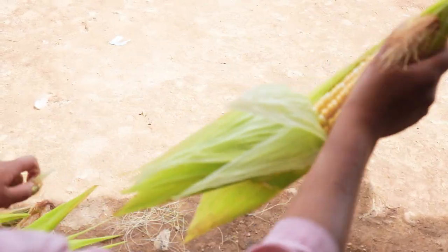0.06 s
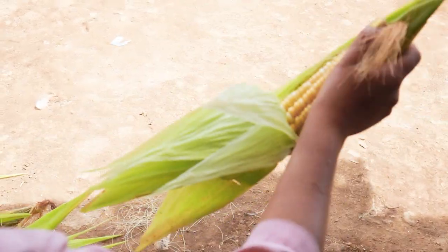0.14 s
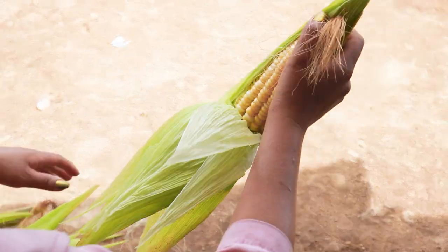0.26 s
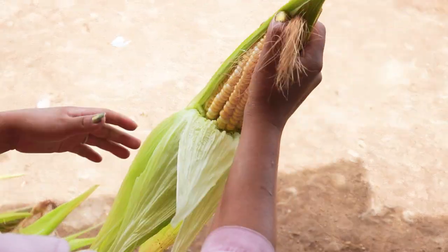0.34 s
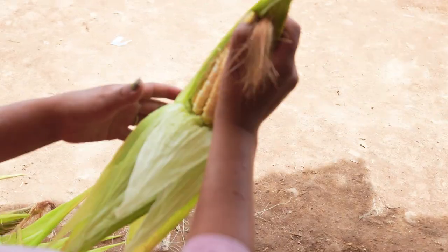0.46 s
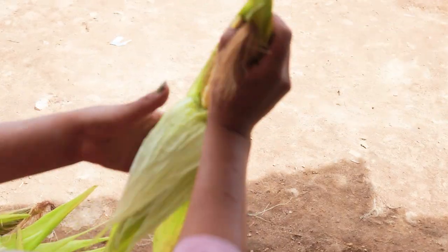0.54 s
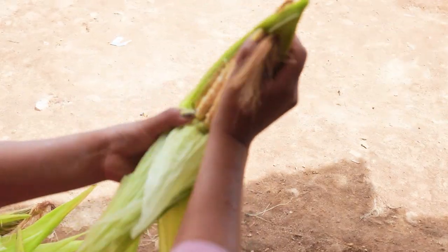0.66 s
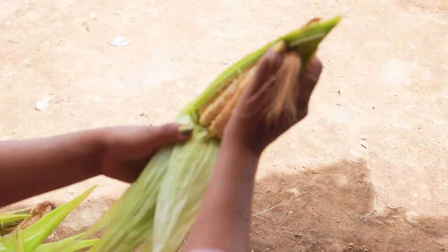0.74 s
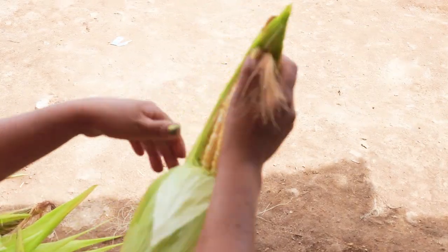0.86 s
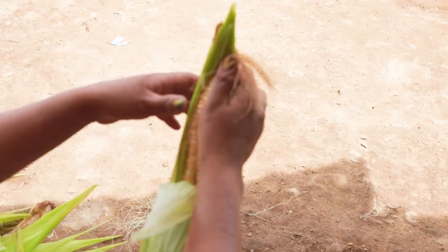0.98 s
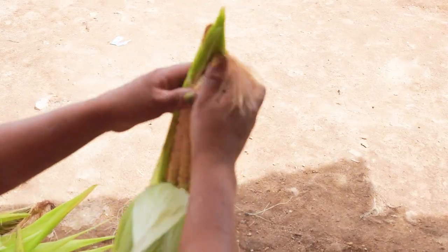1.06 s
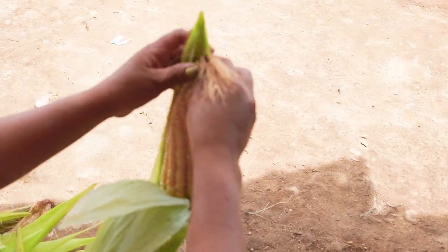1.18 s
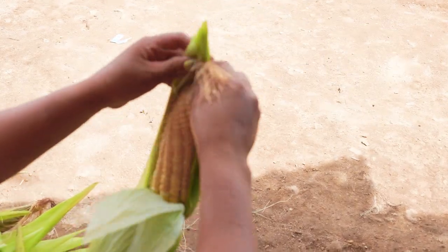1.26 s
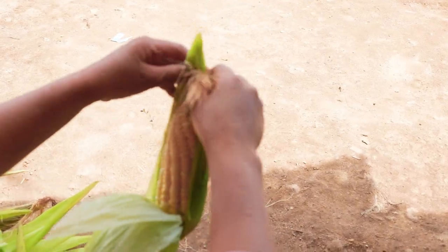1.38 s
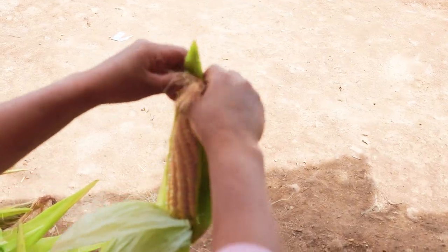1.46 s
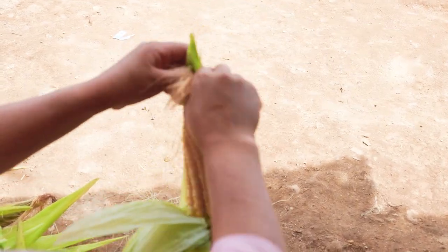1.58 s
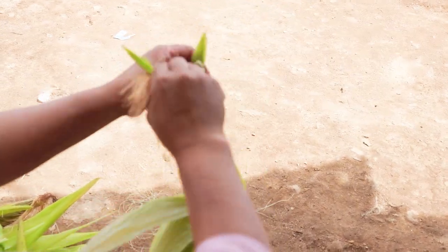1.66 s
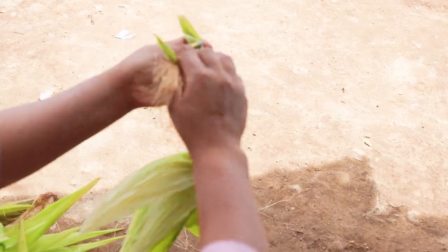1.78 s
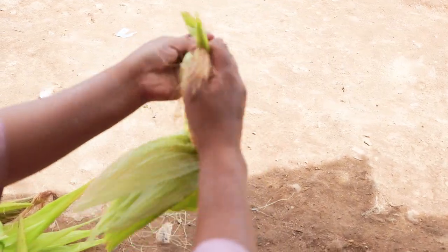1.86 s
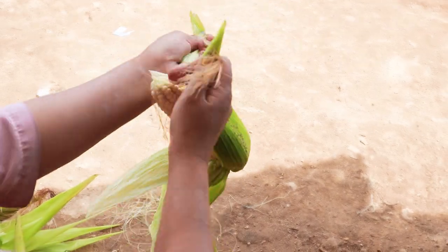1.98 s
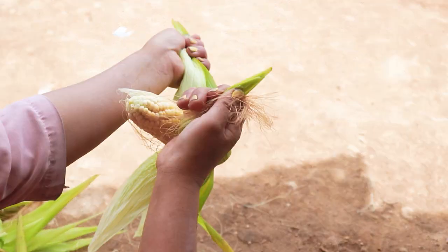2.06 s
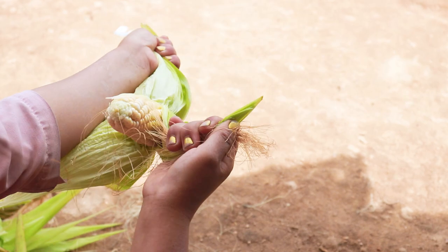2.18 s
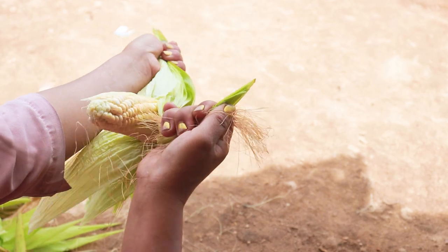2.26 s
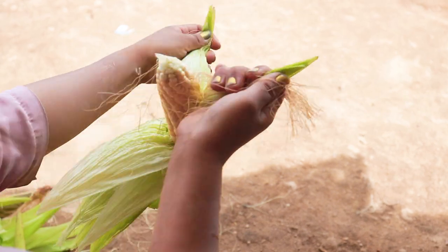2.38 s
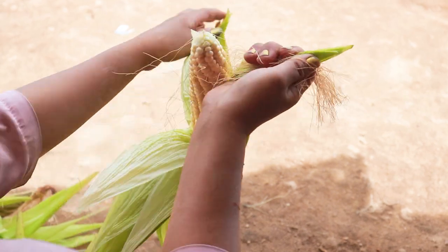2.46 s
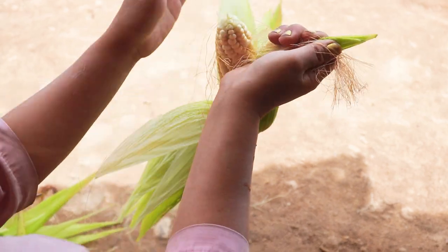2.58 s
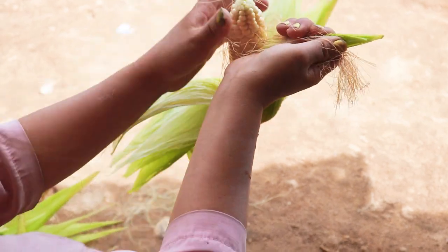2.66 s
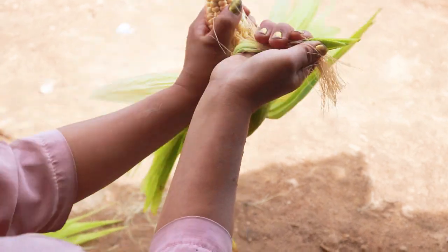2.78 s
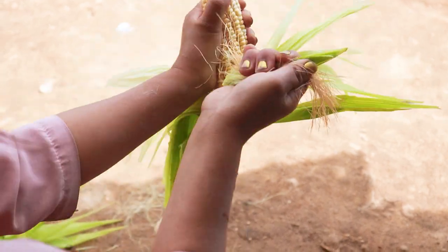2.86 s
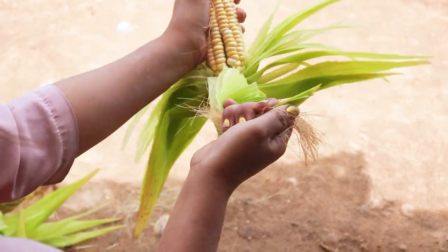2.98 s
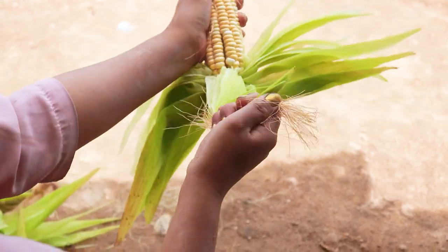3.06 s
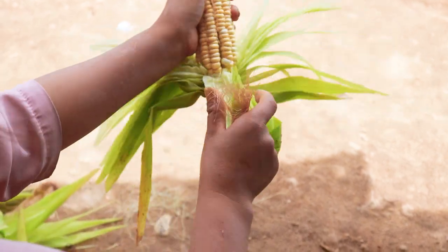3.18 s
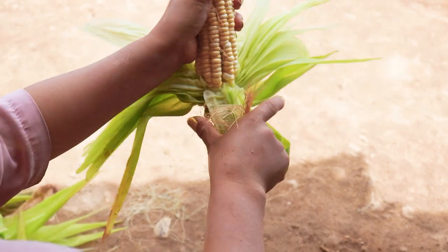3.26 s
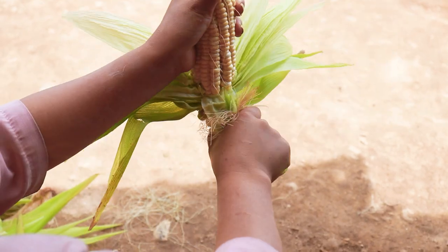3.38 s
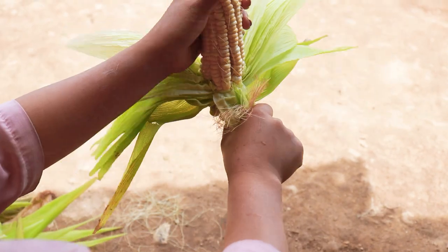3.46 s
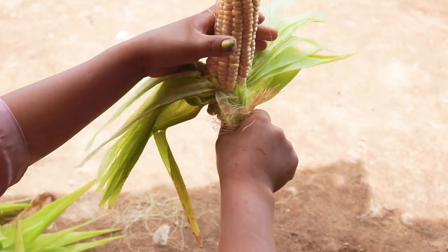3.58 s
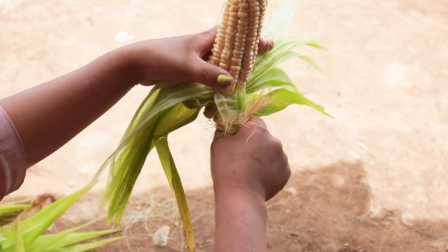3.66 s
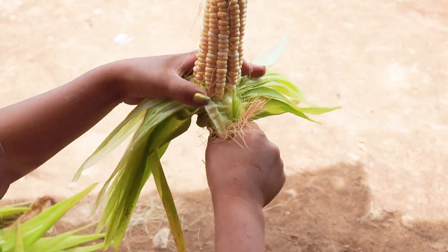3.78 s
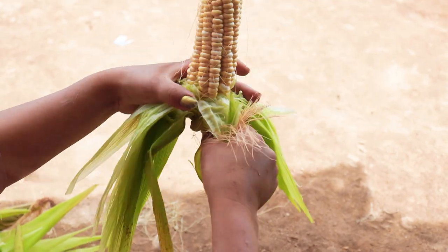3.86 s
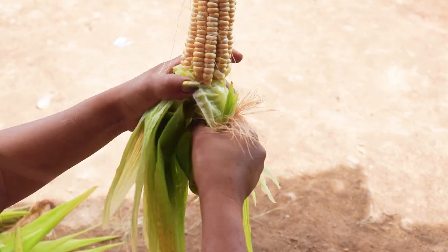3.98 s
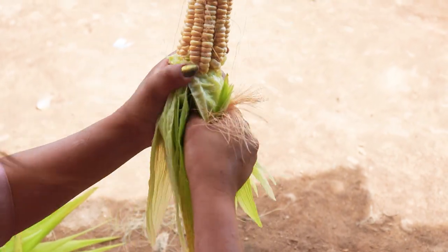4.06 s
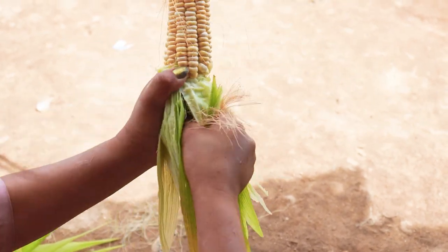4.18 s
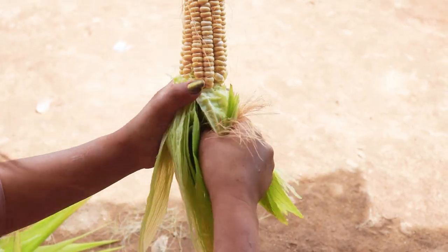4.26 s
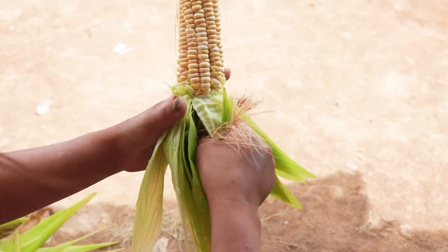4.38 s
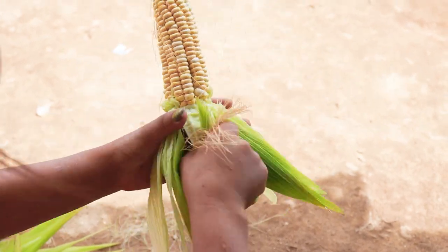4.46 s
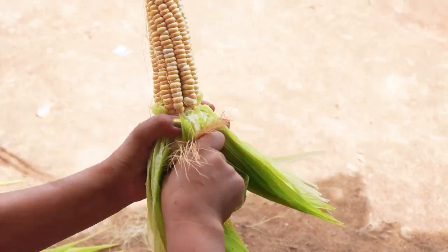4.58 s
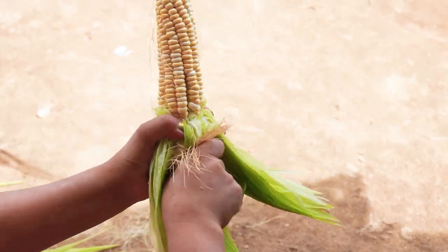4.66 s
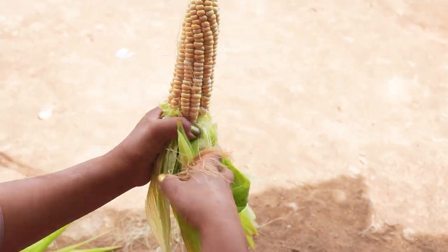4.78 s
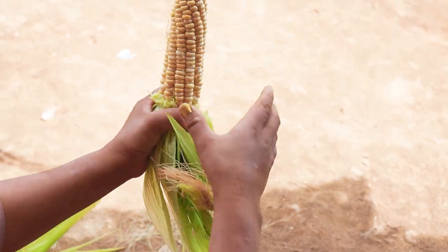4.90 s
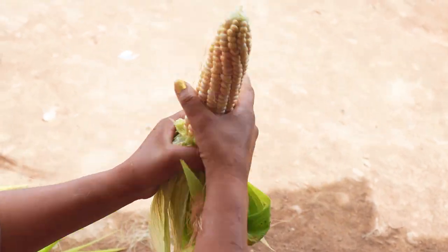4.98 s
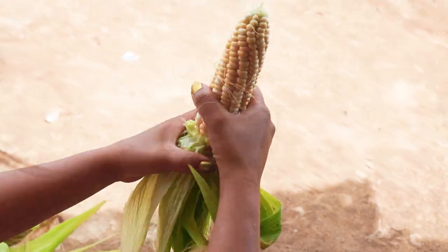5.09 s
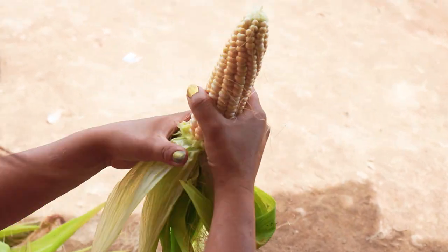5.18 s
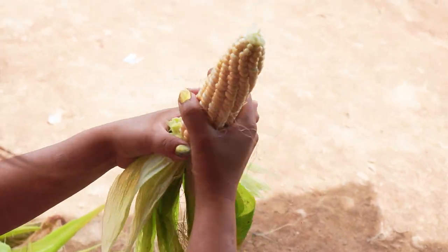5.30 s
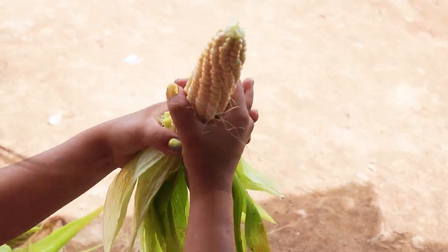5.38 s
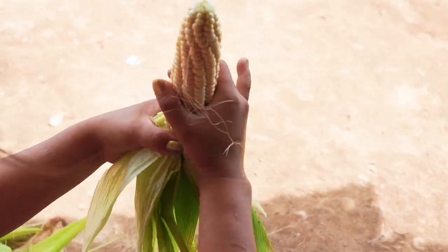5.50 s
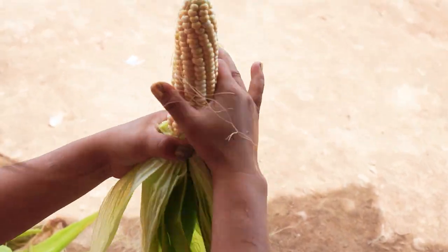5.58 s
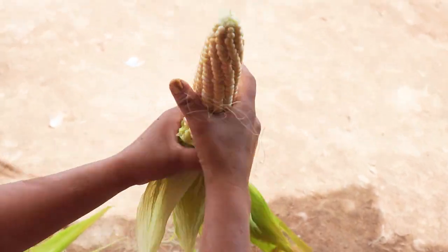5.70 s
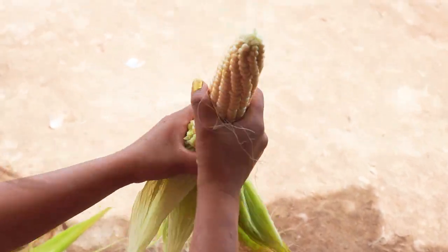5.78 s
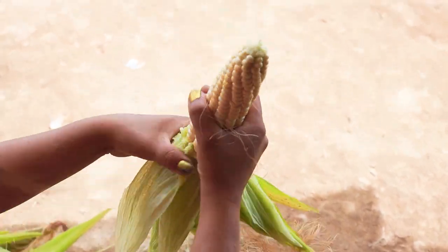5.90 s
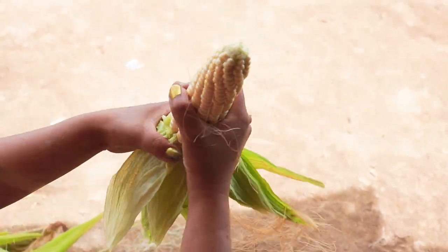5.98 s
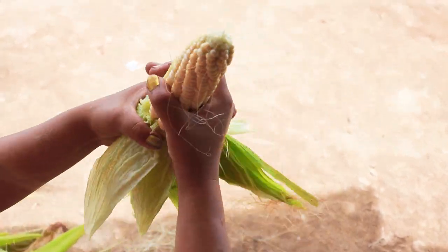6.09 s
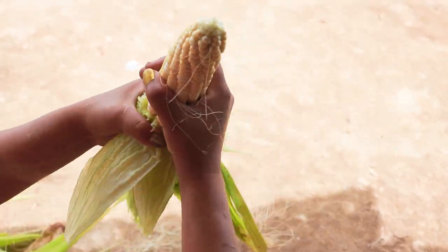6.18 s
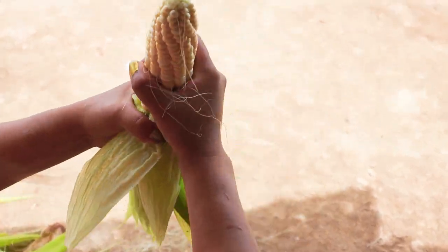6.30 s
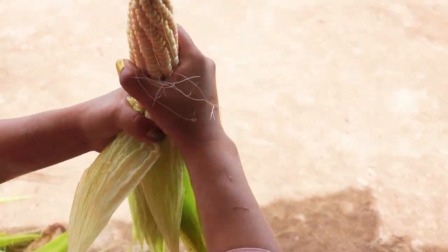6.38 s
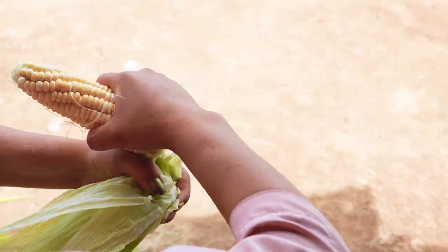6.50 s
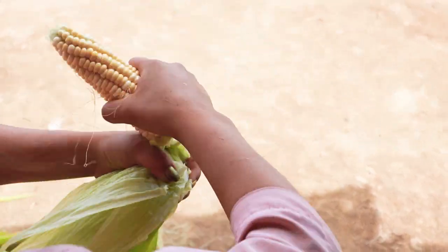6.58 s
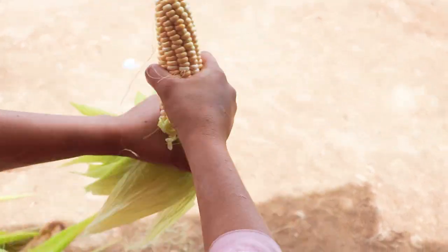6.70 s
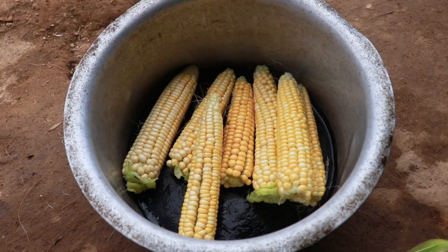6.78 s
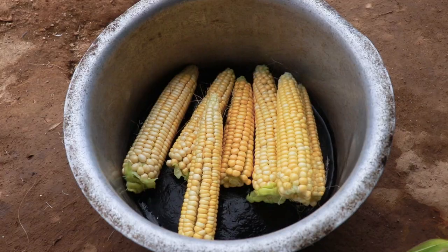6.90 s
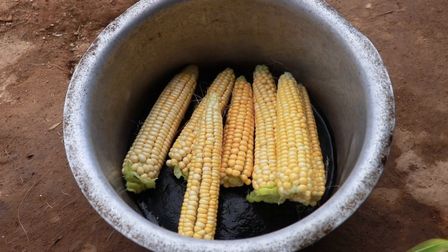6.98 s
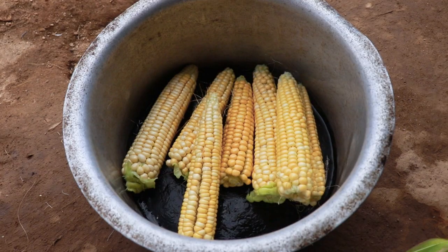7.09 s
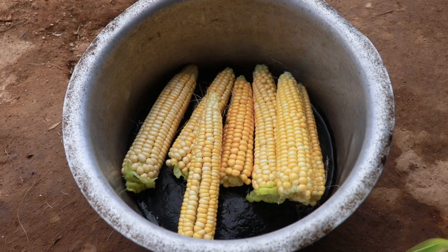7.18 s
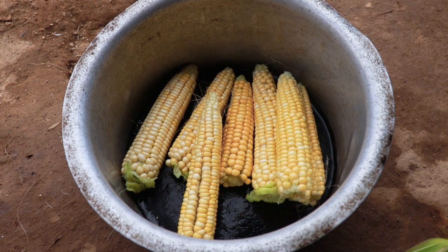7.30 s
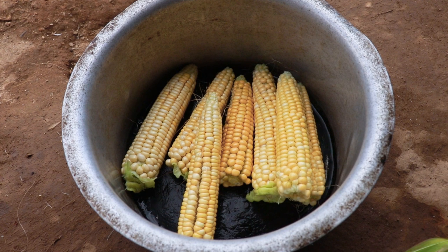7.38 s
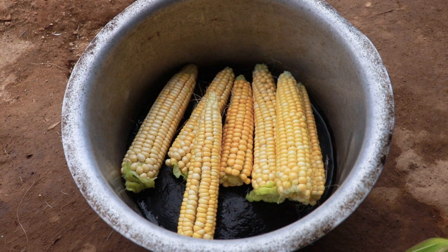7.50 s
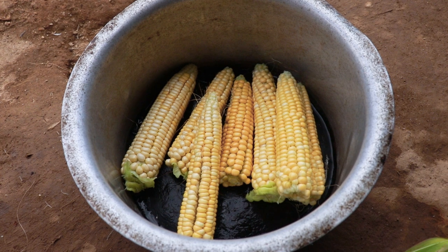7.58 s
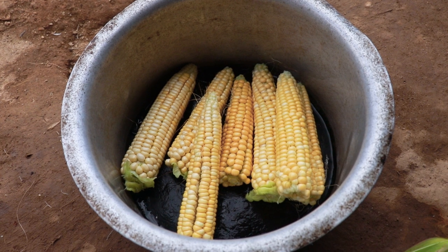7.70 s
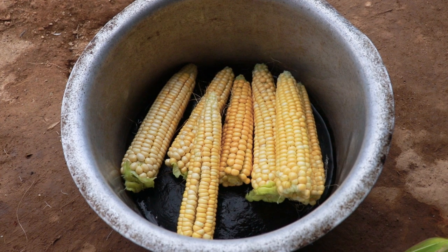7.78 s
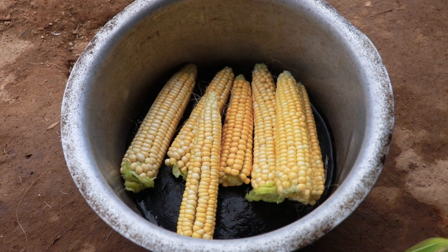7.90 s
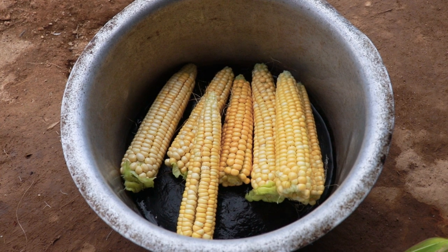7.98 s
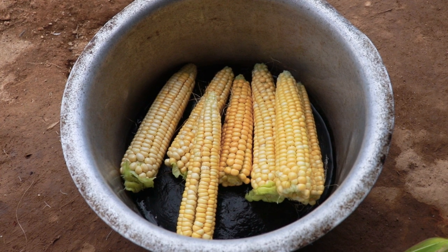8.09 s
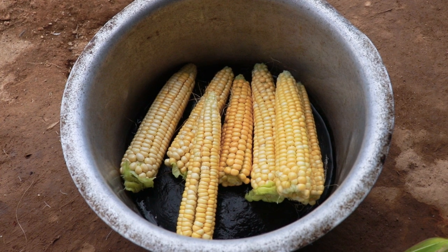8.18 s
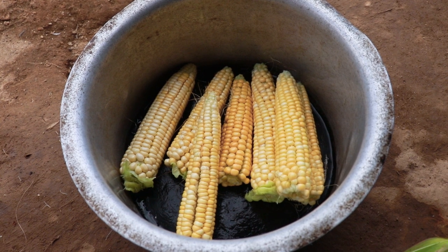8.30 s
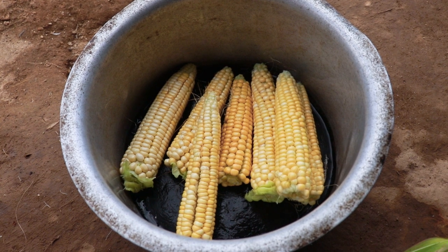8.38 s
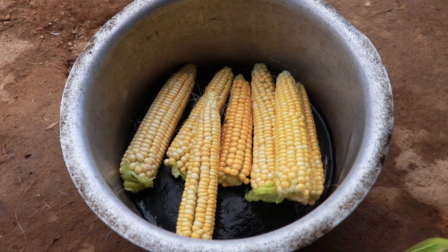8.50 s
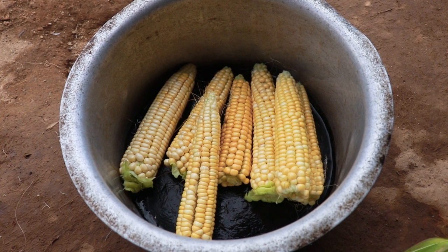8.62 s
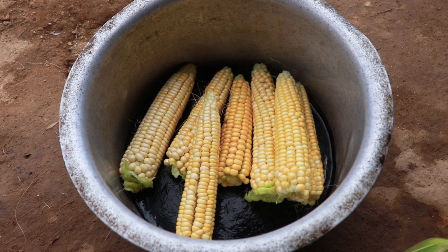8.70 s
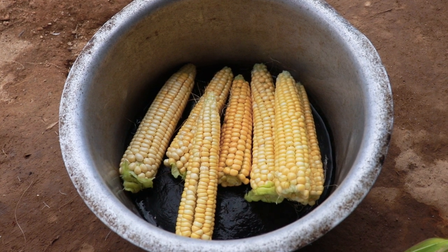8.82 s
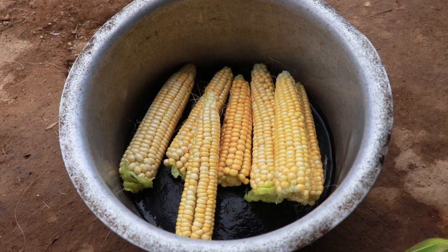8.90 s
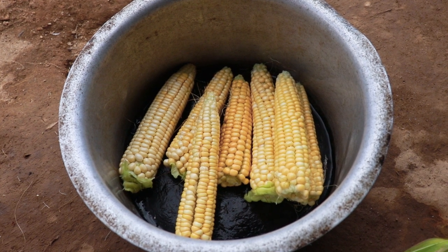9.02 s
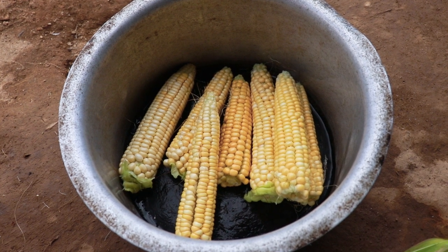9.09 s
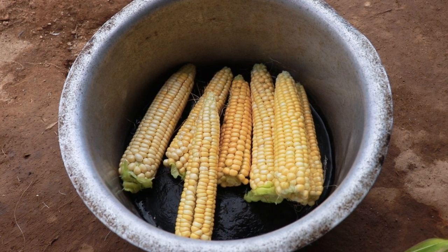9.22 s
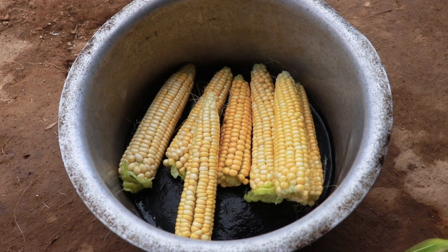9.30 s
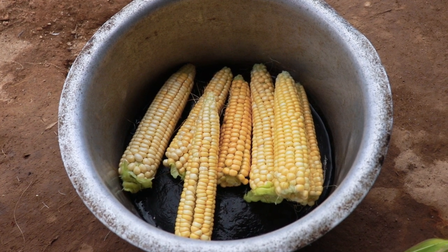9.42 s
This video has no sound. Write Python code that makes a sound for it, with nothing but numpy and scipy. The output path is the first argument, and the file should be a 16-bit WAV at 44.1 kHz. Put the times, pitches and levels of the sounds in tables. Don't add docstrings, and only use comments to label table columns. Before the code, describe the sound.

Fresh maize is husked by hand at arm's length, slightly right of centre, over faint open air. Gentle leaf brushes and a small waxy squeak lead to repeated crunchy tears, snapping fibres and leaf puffs. Squeezing and rustling continue more softly until the stalk cracks off sharply. A short cut to silence follows, then quieter, drier crackles and isolated pops further off to the left.

```python
import sys
import numpy as np
from scipy import signal
from scipy.fft import rfft, irfft, next_fast_len
from scipy.io import wavfile
from scipy.ndimage import uniform_filter1d, map_coordinates

SR = 44100
rng = np.random.default_rng(int(sys.argv[2]) if len(sys.argv) > 2 else 0)


def master(y):
    cut = np.clip(np.atleast_2d(y).T, -1, 1)
    pcm = np.round(cut * 32767)
    wavfile.write(sys.argv[1], SR, pcm.astype(np.int16))


def natural_amplitude(level_db):
    exponent = np.asarray(level_db, float) / 20
    return 10 ** exponent


N = 416744


def unit(x):
    return x / np.sqrt(np.mean(x ** 2) + 1e-20)


def along(points, hz):
    f, v = np.transpose(points)
    return np.interp(np.log(hz + 1), np.log(f + 1), v)


def curve(rows):
    s, value = np.transpose(rows)
    return np.interp(np.arange(N) / SR, s, value)


def wobble(rate):
    knots = rng.standard_normal(int(N * rate / SR) + 4)
    return map_coordinates(knots, [np.arange(N) * rate / SR])


def filtered(x, response):
    n = x.shape[-1]
    m = next_fast_len(n + 2048)
    return irfft(rfft(x, m) * response(np.fft.rfftfreq(m, 1 / SR)), m)[..., :n]


def to_ports(pair, alike):
    turn = lambda hz: np.arccos(np.clip(along(alike, hz), -1, 1)) / 2
    mid = filtered(pair[0], lambda hz: np.cos(turn(hz)))
    side = filtered(pair[1], lambda hz: np.sin(turn(hz)))
    return np.array([mid + side, mid - side])


def placed(shapes, starts):
    at = (starts[:, None] + np.arange(shapes.shape[-1])).ravel()
    return np.array([np.bincount(at, port.ravel(), N + SR)[:N] for port in shapes])


# start_s, level_db
YARD_LEVEL = [
    [(0, -60), (1.4, -59.5), (6.7, -60.5)],
    [(6.86, -61.5), (9.45, -62)],
]
# freq_hz, density_db (per Hz)
YARD_SPECTRUM = [(12, -10), (20, -10), (218, -6.5), (404, -10.5), (521, -10), (652, -9.5), (772, -13),
                 (1690, -15.5), (2120, -18), (5670, -24.5), (9410, -27.5), (15200, -32), (16500, -37)]
# freq_hz, likeness (0 to 1)
YARD_LIKENESS = [(60, 0.76), (300, 0.7), (700, 0.52), (1400, 0.016), (15000, 0.046)]


def yard():
    pair = filtered(rng.standard_normal((2, N)), lambda hz: natural_amplitude(along(YARD_SPECTRUM, hz)))
    level_db = curve(np.vstack(YARD_LEVEL)) + 0.21 * wobble(3.0)
    return natural_amplitude(level_db) * unit(to_ports(pair, YARD_LIKENESS))


# middle_s, peak_db, pitch_hz, length_s
LEAF_PUFFS = [
    (1.611, -44, 70, 0.012),
    (1.646, -56, 61, 0.051),
    (1.776, -50, 68.6, 0.02),
    (1.826, -40, 111, 0.0049),
    (1.833, -45.5, 64.5, 0.028),
]


def puffs():
    t = np.arange(N) / SR
    bumps = np.zeros(N)
    for middle, db, hz, length in LEAF_PUFFS:
        bell = np.exp(-((t - middle) / length * 2) ** 2)
        bumps += natural_amplitude(db) * np.cos(2 * np.pi * hz * (t - middle)) * bell
    return bumps * natural_amplitude([[3], [-4]])


# middle_s, pitch_hz, level_db, length_s
LEAF_SQUEAK = (.94, 650, -57, .05)


def squeak():
    middle, hz, db, length = LEAF_SQUEAK
    t = np.arange(N) / SR - middle
    level = natural_amplitude(db + 4.5 * wobble(71)) * np.exp(-(2 * t / length) ** 4)
    return level * np.sin(2 * np.pi * hz * t)


# start_s, peak_db, pitch_hz
EAR_KNOCKS = [(1.631, -32, 830), (1.766, -33, 746), (2.246, -35.5, 655), (2.961, -39, 970),
              (3.251, -37, 755), (3.324, -43.5, 740), (3.642, -39, 651), (4.095, -50, 1010),
              (4.839, -39, 940), (8.66, -44, 503), (8.879, -53, 571), (9.366, -35.5, 730)]


def knocks():
    s, db, hz = (c[:, None] for c in np.transpose(EAR_KNOCKS))
    t = np.arange(900) / SR
    decay_db = -60 * t / 0.012
    ring = natural_amplitude(db + 3.5 + decay_db) * np.sin(2 * np.pi * hz * t)
    return placed(np.array([ring, ring]), np.round(s[:, 0] * SR).astype(int))


# start_s, pitch_hz, level_db, second_partial_db, rise_s
STALK_HUM = (6.774, 330, -31.5, -30, .003)


def stalk():
    start, hz, db, second_db, rise = STALK_HUM
    sag_hz_per_s, length_s = 900, .031
    t = np.arange(N) / SR - start
    sounding = np.clip(t / rise, 0, 1) * (t < length_s)
    phase = 2 * np.pi * (hz - sag_hz_per_s * t / 2) * t
    hum = natural_amplitude(db) * sounding * (np.sin(phase) + natural_amplitude(second_db) * np.sin(2 * phase))
    return hum * natural_amplitude([[.8], [-.8]])


def strokes(rows):
    swell_db = 20
    rounded = 1.106
    t = np.arange(0, N, 64) / SR
    s, held, db, rise, fall = (c[:, None] for c in np.transpose(rows))
    below = np.maximum(s - t, 0) / rise + np.maximum(t - s - held, 0) / fall
    power = np.sum(natural_amplitude(db - swell_db * below ** rounded) ** 2, axis=0)
    return np.interp(np.arange(N) / SR, t, 10 * np.log10(power + 1e-14))


def unheld(rows):
    return strokes([(s, 0, db, rise, fall) for s, db, rise, fall in rows])


def grains(count, centre_hz, spread, cycles, size_db, lag_s, pan_db, spectrum):
    u, g = rng.random((count, 2)), rng.standard_normal((count, 3))
    port = np.array([.5, -.5])[:, None, None]
    hz = np.clip(centre_hz * np.exp(spread * g[:, :1]), 400, 15000)
    size = natural_amplitude(-size_db * np.log(u[:, 1:]) + port * pan_db * g[:, 2:])
    t = np.maximum(np.arange(64) / SR - .00015 - port * lag_s * g[:, 1:2], 0)
    rings = size * np.sin(2 * np.pi * hz * t) * np.exp(-t * hz / cycles)
    slips = placed(rings, (u[:, 0] * N).astype(int))
    return unit(filtered(slips, lambda f: natural_amplitude(along(spectrum, f))))


# peak_s, level_db, rise_s, fall_s
LEAF_BRUSHES = [
    (.289, -51.5, 0.04, 0.097),
    (.639, -47.5, 0.029, 0.066),
    (.733, -41, .06, 0.05),
    (.858, -45.5, 0.058, 0.066),
    (.94, -47.5, 0.088, 0.063),
    (8.61, -52.5, .013, 0.13),
]
# peak_s, level_db, rise_s, fall_s
TIP_STIRS = [
    (2.57, -56, 0.2, 0.024),
    (3.77, -50.5, 0.076, 0.07),
    (4.358, -59.5, 0.033, 0.052),
    (7.28, -60.5, .2, 0.11),
    (7.653, -72, 0.11, .5),
    (7.917, -58, .8, .065),
    (8.161, -45, 0.058, 0.027),
    (8.875, -61, 0.052, .08),
    (9.01, -50.5, .03, 0.045),
]
# peak_s, level_db, rise_s, fall_s
LEAF_SQUEEZES = [(2.4, -56.5, 0.092, 0.088), (6.11, -52.5, 0.11, .18), (6.28, -56, .1, 0.091),
                 (5.1, -56.5, .1, 0.12), (1.69, -51, 0.22, .1), (1.83, -59.5, 0.11, .5),
                 (2.499, -56.5, 0.45, .43), (2.913, -44, 0.11, 0.18), (3.15, -56, 0.13, 0.64),
                 (3.412, -52, .47, .9), (3.775, -48, .07, 0.12), (4.07, -48, 0.21, .1),
                 (4.35, -54.5, .12, .2), (4.679, -52, 0.41, .36), (4.99, -45.5, .15, .16),
                 (5.225, -54, .12, .09), (5.37, -49, .17, .19), (5.61, -49, .22, .14),
                 (5.685, -50, .06, .07), (5.96, -50, .18, 0.24), (6.48, -53.5, .4, 0.055),
                 (6.75, -51, 0.027, .1), (7.423, -65.5, .3, .3)]
# top_s, held_s, level_db, rise_s
HUSK_TEARS = [
    (1.702, 0.076, -36.5, .005),
    (2.1, .15, -37.5, 0.12),
    (2.976, 0.009, -30.5, 0.035),
    (3.044, 0.022, -35, 0.041),
    (4.092, 0.011, -31, 0.011),
    (4.12, 0.093, -49.5, 0.045),
    (4.889, 0.0078, -38, 0.11),
    (6.524, 0.028, -28, 0.0037),
    (6.778, 0.0015, -35, 0.015),
]
# freq_hz, density_db (per Hz)
LEAF_SPECTRUM = [(300, -8), (700, -11), (1200, -3.5), (2200, 1), (3500, 0.5), (6000, -8.5), (16000, -37)]
# freq_hz, density_db (per Hz)
FIBRE_SPECTRUM = [(1500, -10.5), (3500, -2), (6500, 4), (9000, 2.5), (12000, 0.5), (16000, -4)]


def rustle():
    let_go_s = 0.044
    tear = natural_amplitude(strokes([(*row, let_go_s) for row in HUSK_TEARS]))
    squeeze, brush, stir = (natural_amplitude(unheld(rows)) for rows in (LEAF_SQUEEZES, LEAF_BRUSHES, TIP_STIRS))
    body = grains(count=22000, centre_hz=2020, spread=0.54, cycles=3.4, size_db=1.5, lag_s=5e-5,
                  pan_db=5.0, spectrum=LEAF_SPECTRUM)
    fizz = grains(count=36000, centre_hz=5380, spread=0.69, cycles=0.6, size_db=0.5, lag_s=4e-5,
                  pan_db=4.5, spectrum=FIBRE_SPECTRUM)
    clump = wobble(50)
    lumps = natural_amplitude(0.61 * clump + 4.1 * wobble(90))
    specks = natural_amplitude(1.3 * clump + 3.1 * wobble(93))
    tear_clumpy, loose_clumpy = .35, .6
    loose_body = squeeze + brush + natural_amplitude(-33) * stir
    loose_fizz = natural_amplitude(-6.5) * squeeze + natural_amplitude(-10) * brush + stir
    body *= natural_amplitude(-5.0) * (lumps ** tear_clumpy * tear + lumps ** loose_clumpy * loose_body)
    fizz *= natural_amplitude(-2.0) * (specks ** tear_clumpy * natural_amplitude(-2.5) * tear + specks ** loose_clumpy * loose_fizz)
    return body + fizz


def mode(f, hz, width):
    return 1j * f * width * hz / (hz * hz - f * f + 1j * f * width * hz)


def kind(rows, crack_db):
    return [(*row, crack_db) for row in rows]


# freq_hz, likeness (0 to 1)
SNAP_LIKENESS = [(500, 0.96), (1500, 1), (3000, 0.48), (7000, 0.46), (15000, 0.16)]


def snaps(rows, ring_db, crack_db, width, tail_db, t60, extra_db):
    s, db, hz, bright_db = (c[:, None] for c in np.transpose(rows))
    t = np.arange(1300) / SR
    noise = rng.standard_normal((len(rows), 3, len(t))).transpose(1, 0, 2)
    ragged = natural_amplitude(20 * uniform_filter1d(noise[2], size=30))
    blow = noise[:2] * (natural_amplitude(-3.5 - 60 * t / 0.0074) + natural_amplitude(tail_db - 60 * t / t60) * ragged)
    blow[0, :, 0] = 6 * np.sign(noise[0, :, 0])
    detune = np.exp(0.24 + 0.37 * rng.standard_normal((len(rows), 3)))
    other_hz = np.clip(hz * detune, 600, 9000).T[..., None]

    def response(f):
        soft = 1 / (1 + 1j * f / (2.1 * hz))
        others = sum(mode(f, o, 0.13) for o in other_hz)
        ring = soft * (mode(f, hz, width) + natural_amplitude(extra_db) * others)
        edge = (1j * f / 1800 / (1 + 1j * f / 1800) / (1 + 1j * f / 7000)) ** 2
        return natural_amplitude(ring_db) * ring + natural_amplitude(crack_db + bright_db) * edge

    sound = to_ports(filtered(blow, response), SNAP_LIKENESS)
    lag_s = 1.8e-5 * noise[2, :, :1] * np.array([.5, -.5])[:, None, None]
    sound = filtered(sound, lambda f: np.exp(2j * np.pi * f * lag_s))
    sound /= np.abs(sound).max((0, 2), keepdims=True)
    return placed(natural_amplitude(db) * sound, np.round(s[:, 0] * SR).astype(int))


# start_s, peak_db, pitch_hz
DRY_TICKS = [(7.196, -50, 5660), (7.218, -44.5, 6310), (7.257, -50, 5920), (7.269, -40, 5880),
             (7.297, -44, 4300), (7.427, -38, 2600), (7.479, -51, 6640), (7.588, -35.5, 6960),
             (7.64, -33.5, 6960), (7.658, -42, 3900), (7.76, -39, 4030), (7.784, -39.5, 6700),
             (7.797, -47, 9390), (7.851, -56, 5320), (7.883, -36.5, 6100), (7.909, -41, 8300),
             (7.92, -36, 9400), (8.118, -28.5, 4250), (8.129, -42, 4310), (8.154, -26, 4300),
             (8.88, -43, 2690), (8.966, -44, 5210), (8.996, -44, 7690), (9.002, -26, 3070),
             (9.02, -46, 7320)]
# start_s, peak_db, pitch_hz
DULL_POPS = [
    (7.407, -42, 2670),
    (8.192, -40.5, 2600),
    (8.598, -22, 2880),
    (8.662, -40.5, 2390),
    (8.911, -47, 2710),
    (9.366, -45, 760),
]


def far_fibres():
    rows = kind(DRY_TICKS, 8) + kind(DULL_POPS, -36)
    return natural_amplitude(2.5) * snaps(rows, ring_db=2.5, crack_db=-8, width=0.13, tail_db=-1.5, t60=0.034, extra_db=-9.5)


# start_s, peak_db, pitch_hz
VEIN_POPS = [(.627, -41, 1570), (.841, -38, 2420), (.882, -36, 2230), (1.692, -33, 2720),
             (1.776, -19.5, 3010), (2.18, -19, 1880), (2.259, -22.5, 1900), (2.941, -16, 2060),
             (2.963, -17, 3470), (3.252, -38.5, 835), (3.347, -34, 2380), (3.394, -31, 3100),
             (3.411, -19, 2090), (3.585, -22.5, 2920), (3.642, -32, 2310), (3.675, -35, 2830),
             (4.028, -31, 2400), (4.108, -16, 3660), (4.672, -32.5, 2350), (4.76, -35.5, 1930),
             (4.876, -20.5, 1380), (4.946, -23.5, 2480), (4.977, -30, 2210), (5.392, -27, 2710),
             (5.628, -33.5, 2130), (5.684, -33.5, 2540), (6.106, -38, 2260), (6.397, -30, 2300),
             (6.443, -32, 2100), (6.483, -30, 1260)]


def popping_veins():
    rows = kind(VEIN_POPS, -52)
    return snaps(rows, ring_db=16, crack_db=12.5, width=0.23, tail_db=-5, t60=0.057, extra_db=-8.0)


# start_s, peak_db, pitch_hz
EDGE_CRACKS = [(.744, -27, 2400), (1.744, -26, 3900), (1.766, -25, 2230), (1.792, -23.5, 4330),
               (2.043, -30, 2080), (2.165, -37, 1680), (2.193, -19, 2300), (2.217, -12, 2030),
               (2.254, -19, 5400), (2.892, -46, 2070), (2.909, -29, 7550), (3.034, -10, 1780),
               (3.077, -25, 1650), (3.086, -20.5, 5360), (3.15, -37, 5900), (3.16, -20.5, 5960),
               (3.183, -34, 1890), (3.81, -26, 3340), (3.881, -38, 5000), (3.98, -28, 5500),
               (4.081, -17, 2270), (4.123, -27, 5860), (4.157, -29, 2070), (4.177, -26, 2090),
               (4.188, -12.5, 2010), (4.197, -31, 2130), (4.541, -33, 2280), (4.64, -30, 6330),
               (4.965, -29.5, 4090), (5.053, -30, 3200)]


def cracking_edges():
    rows = kind(EDGE_CRACKS, 2)
    return snaps(rows, ring_db=15.5, crack_db=7.5, width=0.28, tail_db=-4.5, t60=0.034, extra_db=-13.0)


def strays(count):
    squeeze_db = unheld(LEAF_SQUEEZES)
    share = np.cumsum(natural_amplitude(squeeze_db))
    u, g = rng.random(count), rng.standard_normal((count, 3))
    at = np.searchsorted(share, share[-1] * (np.arange(count) + u) / count).clip(0, N - 1)
    peak_db = squeeze_db[at] + 13.5 + 3.1 * g[:, 0]
    pitch_hz = 2300 * np.exp(.45 * g[:, 1])
    return np.c_[at / SR, peak_db, pitch_hz, -4 + 6.1 * g[:, 2]]


# start_s, peak_db, pitch_hz
FIBRE_SNAPS = [(.722, -43, 2470), (1.633, -20.5, 2700), (1.701, -21, 2724), (2.082, -27, 3260),
               (2.146, -25.5, 1240), (2.208, -17, 1480), (2.247, -11.5, 4300), (2.395, -37.5, 2120),
               (2.402, -33.5, 5350), (2.815, -36.5, 2420), (2.977, -14, 2100), (2.981, -16.5, 6300),
               (3.015, -19, 3060), (3.043, -11.5, 6600), (3.061, -12.5, 2800), (3.116, -27.5, 5630),
               (3.201, -31.5, 2950), (3.307, -36, 2570), (3.692, -41, 3230), (3.823, -30.5, 2420),
               (4.047, -30.5, 3900), (4.088, -10, 5100), (4.097, -15, 1610), (4.242, -34, 1980),
               (4.337, -34.5, 2930), (4.901, -25, 1770), (5.09, -33, 2220), (5.122, -30, 1690),
               (5.153, -35, 1520), (6.258, -35.5, 5460),
               (0.78, -40.5, 2450), (2.634, -45, 4130), (3.324, -35.5, 835), (3.775, -33, 6460),
               (4.141, -32, 1640), (4.363, -37.5, 2950), (4.704, -42, 2280), (4.738, -39, 1120),
               (4.78, -37, 6250), (4.994, -35.5, 1740), (5.229, -42, 2700), (5.835, -44.5, 2760),
               (5.962, -37, 5500), (6.151, -36, 3050), (6.17, -43, 5360), (6.273, -41, 1640)]
# start_s, peak_db, pitch_hz, crack_share_db
STALK_BREAK = [(6.422, -35.5, 1450, -23), (6.459, -31, 6250, 11), (6.478, -33.5, 5000, -25),
               (6.52, -4.5, 1350, -6), (6.526, -8, 1080, -1), (6.54, -11, 6000, 4), (6.549, -21, 2460, -21),
               (6.558, -14.5, 2350, -22), (6.576, -28, 2730, -3), (6.724, -24.5, 1910, 4),
               (6.73, -18.5, 2130, 2), (6.769, -22.5, 4080, -8), (6.791, -27, 560, 9),
               (6.803, -16.5, 2980, -4)]


def near_fibres():
    rows = np.vstack([kind(FIBRE_SNAPS, -4), STALK_BREAK, strays(count=24)])
    return snaps(rows, ring_db=20, crack_db=9.5, width=0.2, tail_db=-5.5, t60=0.033, extra_db=-8.5)


# freq_hz, difference_db
NEAR_TILT = [(300, .5), (1000, -0.5), (2500, -5), (5000, -1.3), (12000, -1)]


def scene():
    work = rustle() + knocks() + squeak()
    work += far_fibres() + popping_veins() + cracking_edges() + near_fibres()
    work = filtered(work, lambda hz: (1j * hz / 250 / (1 + 1j * hz / 250)) ** 2)
    late = np.arange(N) > 6.83 * SR
    near = filtered(work * ~late, lambda hz: natural_amplitude(np.outer([.5, -.5], along(NEAR_TILT, hz))))
    far = work * late * natural_amplitude([[1.4], [-1.4]])
    far[1] = np.roll(far[1], shift=9)
    return yard() + puffs() + stalk() + far + near


def band_limit(x):
    return signal.sosfilt(signal.butter(12, 16830, fs=SR, output="sos"), x)


# start_s, level_db
SCENE_CHANGE = [
    (0, 0),
    (6.8045, 0),
    (6.806, -22),
    (6.816, -6),
    (6.818, -40),
    (6.826, -60),
    (6.843, -60),
    (6.845, 0),
    (9.45, 0),
]


def record(dry):
    top_hz = 15750
    heard = filtered(dry, lambda hz: 1 / (1 + (hz / top_hz) ** 60))
    mix = heard * natural_amplitude(curve(SCENE_CHANGE))
    return band_limit(mix)


dry = scene()
out = record(dry)
master(out)
```